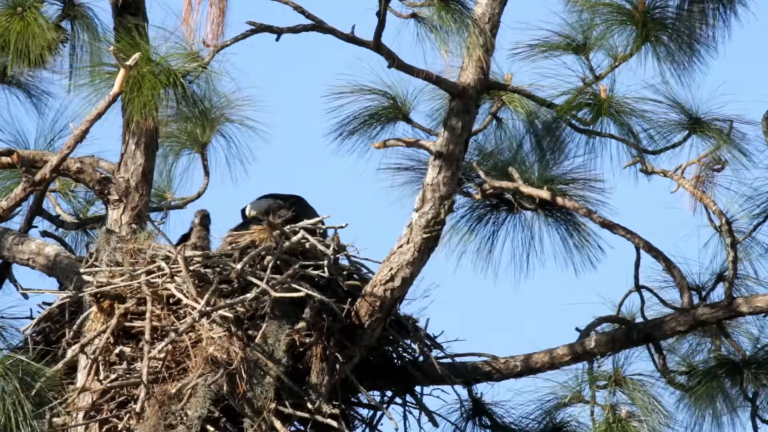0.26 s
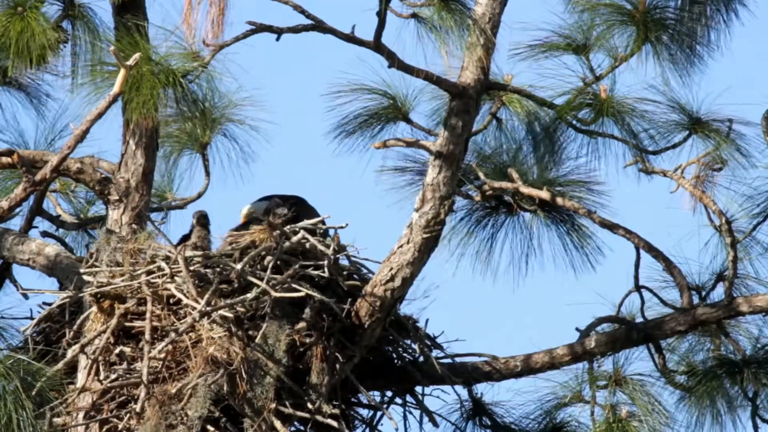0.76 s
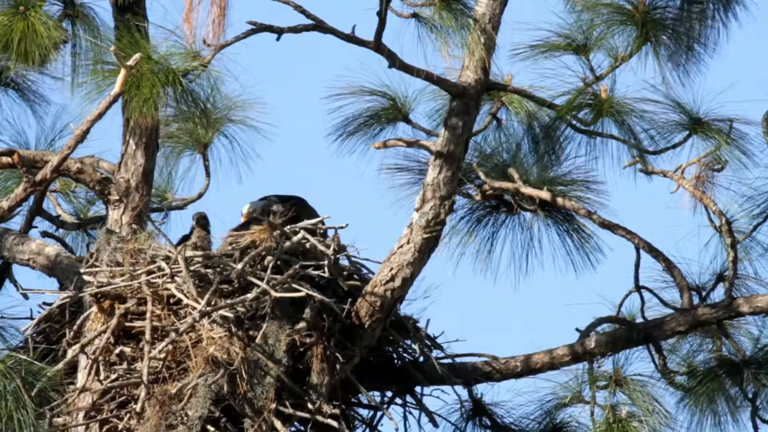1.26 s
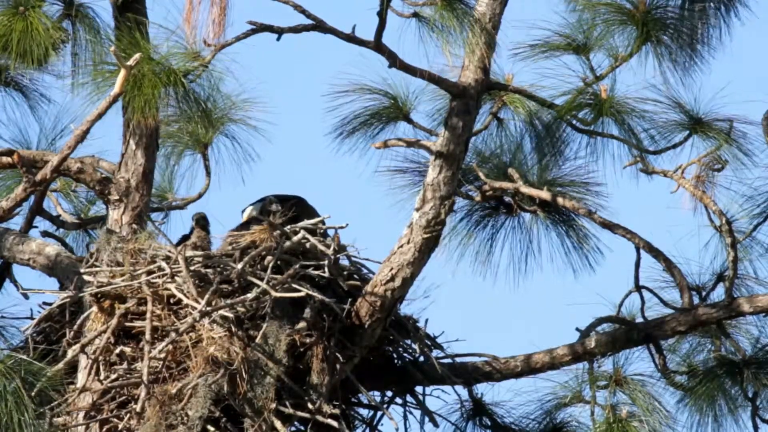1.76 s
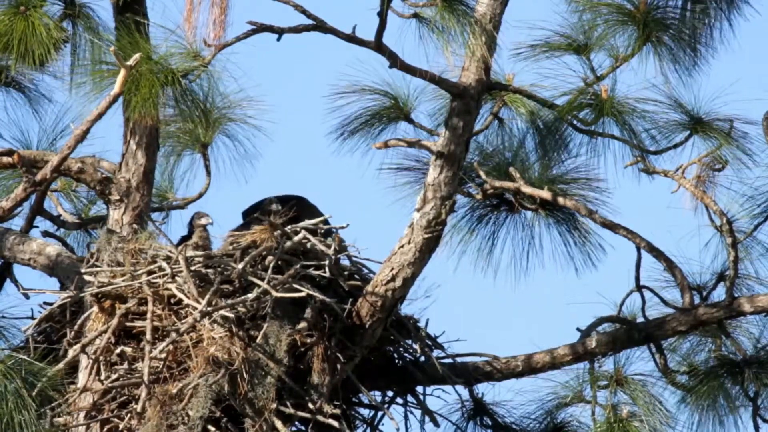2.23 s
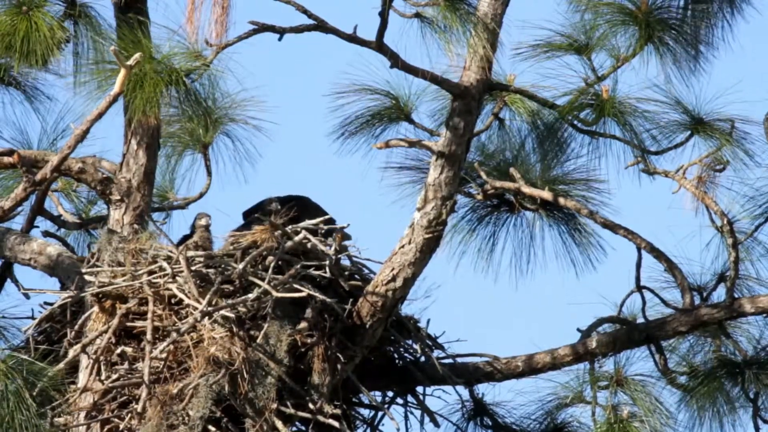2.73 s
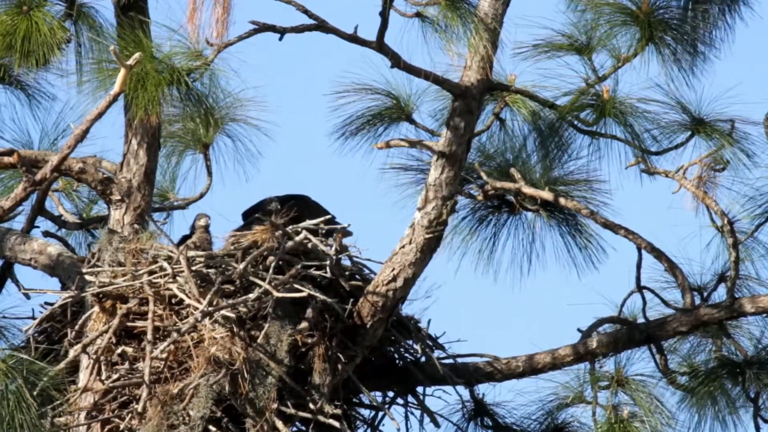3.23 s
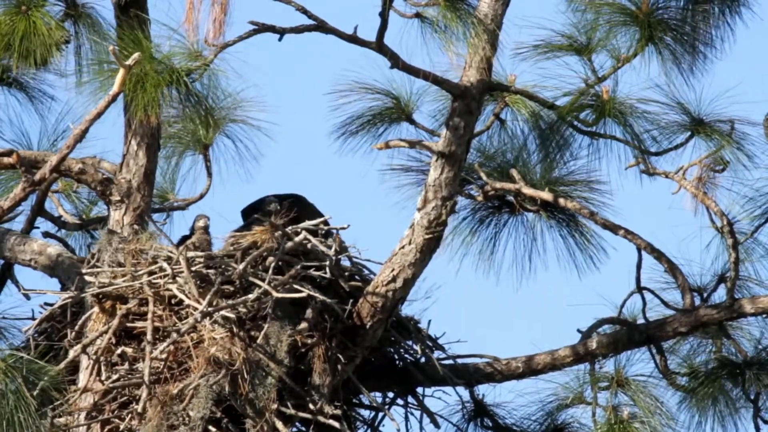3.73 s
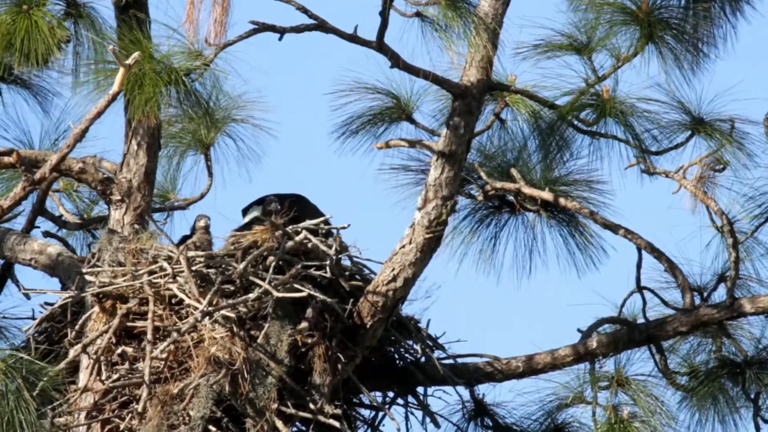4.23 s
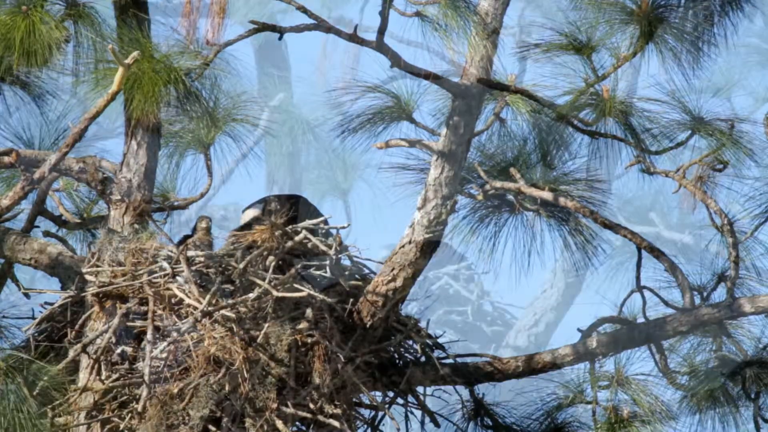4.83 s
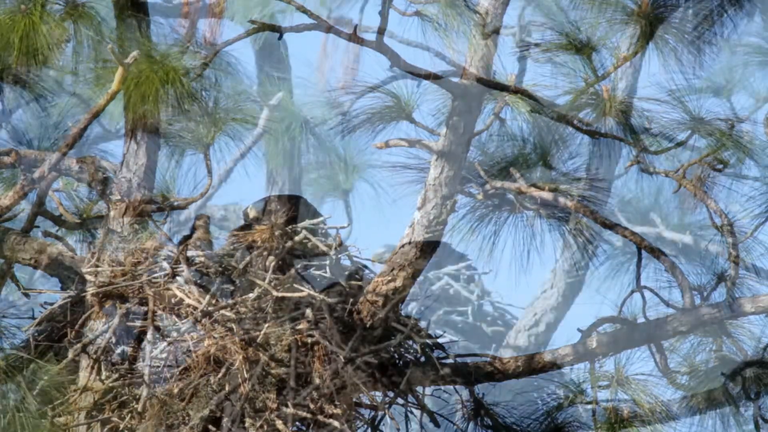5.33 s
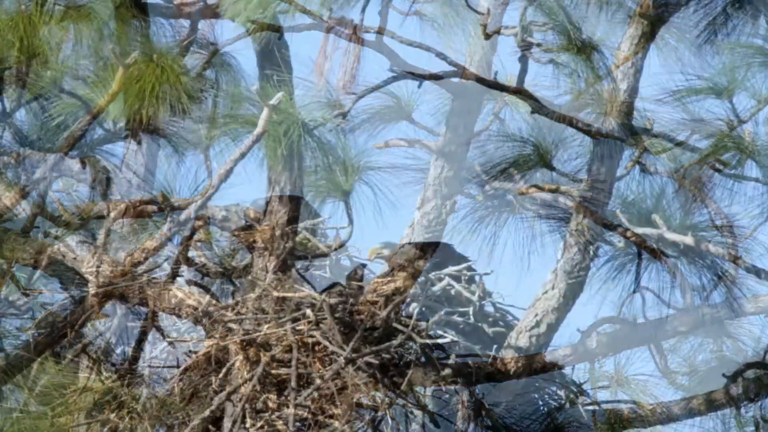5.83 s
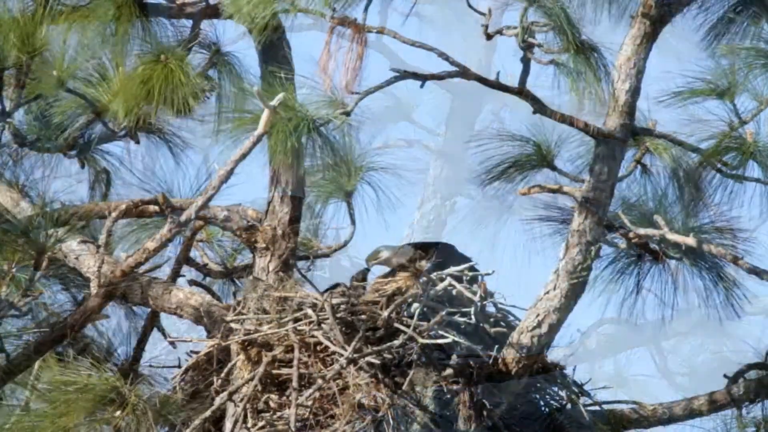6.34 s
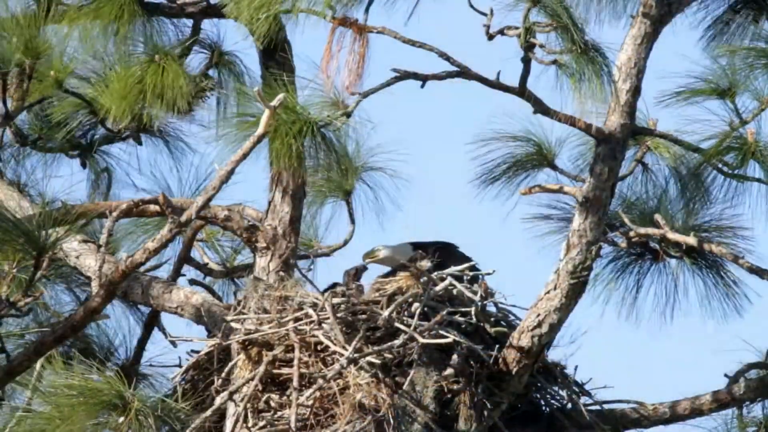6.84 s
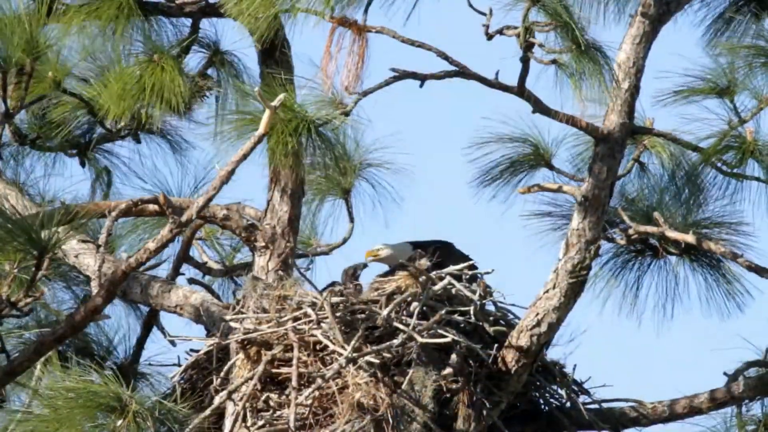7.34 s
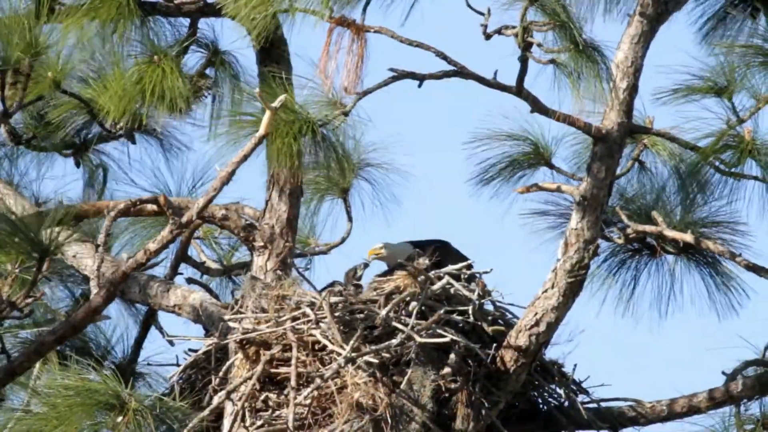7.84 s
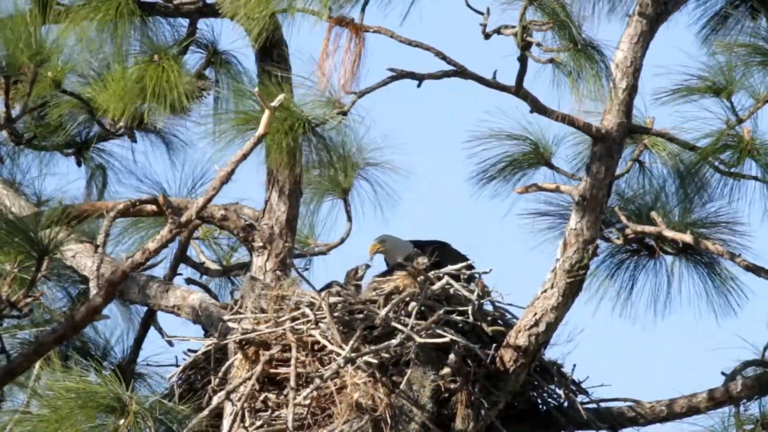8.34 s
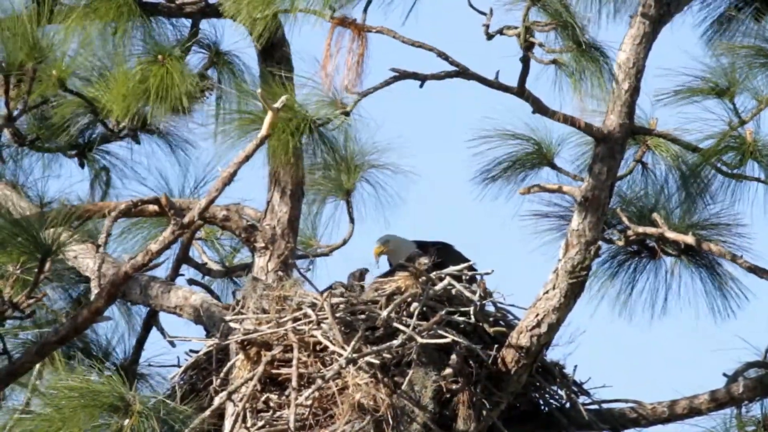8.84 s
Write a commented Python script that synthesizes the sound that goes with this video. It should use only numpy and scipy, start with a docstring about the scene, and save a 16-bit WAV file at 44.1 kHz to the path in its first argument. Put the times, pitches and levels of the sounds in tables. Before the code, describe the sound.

Outdoors at a treetop eagle nest, hoarse high chirps and fast trilling buzzes come in almost unbroken succession, with sharp little falling squeaks and rattling pips. They are densest at the start and sparser, softer later. A low steady machine hum lies underneath and fades after the middle. Light wind rumbles on the stereo microphone, distant traffic washes, and airy hiss stays constant.

```python
"""Small birds among pines

A flock buzzes, chirps, rattles and whistles: swinging tones and short gliding sines, with sparse echoes from trunks.
Under the birds a low machine hum fades away, far traffic washes and wind rumbles on two microphone ports,
all of it shaped noise or sines; wide hisses brush the treble now and then, over a constant airy hiss."""
import sys
import numpy as np
from scipy import signal
from scipy.fft import rfft, irfft, next_fast_len
from scipy.io import wavfile
from scipy.ndimage import uniform_filter1d

SR = 44100
rng = np.random.default_rng(int(sys.argv[2]) if len(sys.argv) > 2 else 0)


def digitize_waveform(pressure):
    """Quantize a signal to 16-bit integers and store it at the path in sys.argv[1].

    Rows of a 2-D input are taken as channels; values are limited to [-1, 1].
    """
    field = np.atleast_2d(pressure).T
    bounded = np.clip(field, -1, 1)
    quanta = np.round(bounded * 32767).astype(np.int16)
    wavfile.write(sys.argv[1], SR, quanta)


N = 400869  # length in samples

# Buzzes of the flock, swinging between two pitches; level is ahead of the bird mix and throat filter:
# start_s, length_s, effort_db, overtones_over_voice_db, nominal_low_turn_hz
BUZZ_CALLS = [(-.08, .14, -36, -11.5, 2622), (0.118, 0.3, -44, -9, 3314), (.47, 0.16, -51.5, 2, 3320),
              (.67, 0.2, -53.5, -4, 2499), (0.819, 0.41, -49.5, -13, 2647), (1.121, 0.17, -42, -13, 2877),
              (1.259, 0.19, -44.5, -11, 3236), (1.475, 0.38, -45.5, -13, 2914),
              (1.916, 0.094, -45, -11, 2680), (2.019, .17, -39.5, -13.5, 3080),
              (2.202, 0.15, -61.5, 5.5, 2696), (2.447, 0.17, -45, -12.5, 2965),
              (2.627, 0.13, -50, -3, 2714), (2.821, 0.35, -50.5, -8, 2917), (3.222, 0.3, -46.5, -11, 2752),
              (3.612, 0.21, -48, -14, 3227), (3.897, 0.19, -45.5, -10.5, 3003),
              (4.291, 0.45, -42.5, -17.5, 3314), (4.72, 0.22, -49.5, -10.5, 2728),
              (4.952, 0.19, -45.5, -17, 2680), (5.157, 0.13, -46, -12, 2676),
              (5.34, 0.27, -47.5, -12, 2895), (5.662, 0.25, -48.5, -13, 3123),
              (5.991, 0.52, -48.5, -12.5, 3500), (6.421, 0.27, -55, -10, 3020),
              (6.732, 0.36, -53, -10.5, 3030), (7.081, 0.18, -51.5, -12.5, 2985),
              (7.27, 0.15, -48, -19, 3020), (7.442, 0.15, -53, -13, 3010), (7.789, 0.18, -52, -10.5, 3040),
              (8.006, 0.3, -47.5, -12.5, 3475), (8.42, 0.42, -50.5, -14, 3040),
              (8.858, 0.33, -47.5, -13.5, 2946)]
# Colour difference between the two ports: pitch_hz, left_minus_right_db
PORT_COLOUR = [(60, -7), (180, -6), (550, -8.5), (1650, -3.5), (4970, 5.5), (15000, 1.5)]


def undb(db):
    """Decibels to gain."""
    return 10 ** (np.asarray(db) / 20)


def evened(x):
    """Scales a signal to rms 1."""
    return x / np.sqrt(np.mean(np.abs(x) ** 2) + 1e-20)


def read(points, hz):
    """Reads a spectrum table at hz, along a logarithmic pitch axis."""
    f, value = np.transpose(points)
    return np.interp(np.log(hz + 1), np.log(f + 1), value)


def curves(rows, t):
    """Reads every column of a time curve at t."""
    s, *columns = np.transpose(rows)
    return [np.interp(t, s, column) for column in columns]


def coloured(x, points, share=1):
    """Filters by a spectrum table, its decibels scaled by share."""
    size = next_fast_len(N)
    gain = undb(share * read(points, np.fft.rfftfreq(size, 1 / SR)))
    return irfft(rfft(x, size) * gain, size)[..., :N]


def wander(hz, channels=1):
    """Random drift of rms 1, low-passed at hz."""
    b, a = signal.butter(2, hz, fs=SR)
    return evened(signal.lfilter(b, a, rng.standard_normal((channels, N))))


def noise(points, same, patchy_db, tilt_db=0):
    """Two-port noise in drifting patches; same sets the likeness of the ports, tilt_db brightens per octave."""
    frames, hz = N // 256 + 5, np.fft.rfftfreq(1024, 1 / SR)[:, None]
    a, b, c, d, patches = rng.standard_normal((frames, 513, 5)).T
    patches = evened(uniform_filter1d(uniform_filter1d(patches, 10, 0), 14, 1))
    same = np.clip(same, -1, 1)
    left = a + 1j * b
    right = same * left + np.sqrt(1 - same ** 2) * (c + 1j * d)
    octaves = np.log2(np.maximum(hz / 800, 1))  # above 800 Hz
    z = np.array([left, right]) * undb(read(points, hz) + patchy_db * patches + tilt_db * octaves)
    return evened(signal.istft(z, nperseg=1024, noverlap=768)[1][:, :N])


def effort(t):
    """Gains of the flock's voices and overtones: each buzz swells and breaks off, all summed in power."""
    # Farther birds that fill the gaps: time_s, level_db
    between = [(0, -47), (5, -54.5), (6.6, -82), (9.09, -92)]
    attack_s, release_s, swell_db, between_over_db = 0.075, 0.072, 0.5, -16
    start, length, db, over_db, _ = np.transpose(BUZZ_CALLS)[:, :, None]
    edges = np.clip((t - start) / attack_s, 0, 1) * np.clip((start + length - t) / release_s, 0, 1)
    swelling_db = db - swell_db * np.clip(1 - (t - start) / length, 0, 1)
    power = (edges * undb(swelling_db)) ** 2
    rest = undb(curves(between, t)[0]) ** 2
    voice_power = power.sum(0) + rest
    over_power = (power * undb(over_db) ** 2).sum(0) + rest * undb(between_over_db) ** 2
    return np.sqrt([voice_power, over_power])


def buzzing(high_hz=4350, per_s=84, jitter=.04, hoarse_hz=250, near_db=-2, crowd_db=-10):
    """A near bird and four far ones: a hoarse tone swings fast between its turns, with overtones."""
    # Colour of the overtones: pitch_hz, level_db
    overtones = [(5000, 14), (5700, 9.5), (6500, 4.5), (7700, 1.5), (8500, -4), (9200, -1.5), (13000, -14),
                 (16000, -24)]
    # Throat filter, passing the voice between firm edges: pitch_hz, gain_db
    throat = [(1800, -26), (2400, 5), (3300, -7), (4300, -4), (4750, -82), (6000, -40)]
    # Breath noise in each voice, near bird first: power_share (0..1)
    breath_share = np.array([[.8], [.9], [.9], [.9], [.9]])
    t = np.arange(N) / SR
    start, *_, low_hz = np.transpose(BUZZ_CALLS)
    low = low_hz[np.searchsorted(start, t, "right") - 1]
    pace = np.array([[1], [.8], [.91], [1.13], [1.27]])  # each bird's swing rate against per_s
    rate = per_s * (pace + jitter * wander(39.8, channels=5))
    swing = np.sin(np.pi * np.cumsum(rate, 1) / SR) ** 2

    # each bird's two turning pitches drift on their own
    knots = rng.standard_normal((2, 5, 60))
    low_drift, high_drift = ([np.interp(t, np.linspace(0, t[-1], len(k)), k) for k in turn] for turn in knots)
    low = low * (1 + .05 * np.array(low_drift))
    high = high_hz * (.95 + .035 * np.array(high_drift))
    turn = np.exp(2j * np.pi * np.cumsum(low + (high - low) * swing ** 1.2, 1) / SR)

    breath = wander(hoarse_hz, channels=5) + 1j * wander(hoarse_hz, channels=5)
    near, *far = (turn * (np.sqrt(2 - 2 * breath_share) + np.sqrt(breath_share) * breath)).real
    crowd = np.array([far[0] + far[2], far[1] + far[3]])  # two far birds to each port

    # second and third harmonics, brightest on the upper turn
    over = ((turn ** 2 + 1.18 * turn ** 3) * (.35 + swing) * wander(600, channels=5)).real
    left, right = over[1] + over[3] + 0.93 * over[0], over[2] + over[4] - 0.77 * over[0]
    over = evened(coloured(np.array([left, right]), overtones))

    voice_gain, over_gain = (np.interp(t, t[::64], gain) for gain in effort(t[::64]))
    voices = coloured(undb(near_db) * near + undb(crowd_db) * crowd, throat)
    return voice_gain * voices + over_gain * over


def rattles(top_hz=4250, dwell=2.4, top_db=-10, octave_db=-7):
    """A near bird's pips: a tone swings up and back, loud where it dwells low; its octave streaks the treble."""
    # Runs of clear pips, level ahead of the swell and a common doubling:
    # start_s, length_s, first_low_turn_hz, pips_per_s, level_db
    runs = [(0.208, 0.11, 2870, 84, -36.5), (0.484, 0.14, 2880, 92, -39), (0.856, 0.067, 2940, 85, -50),
            (1.194, 0.076, 3035, 99, -48), (1.294, 0.24, 2880, 89, -43.5), (1.592, 0.17, 3100, 84.5, -48),
            (2.048, 0.041, 3270, 66, -44.5), (2.878, .065, 2940, 80, -48.5),
            (3.774, 0.082, 2870, 103, -45.5), (5.02, .13, 2890, 92, -48.5), (8.037, 0.13, 3200, 61, -51),
            (9.035, 0.074, 2950, 82, -45.5)]
    sink_hz, rough_share, voice_left_db, octave_left_db = 318, .3, -1.5, 1.4
    out = np.zeros((2, N + SR))  # rows: voice, octave
    for s, length, first_hz, pips_per_s, db in runs:
        t = np.arange(round(length * SR)) / SR
        up = np.sin(np.pi * pips_per_s * t) ** 2
        low_hz = first_hz - sink_hz * t / length
        phase = 2 * np.pi * np.cumsum(low_hz + (top_hz - low_hz) * up ** dwell) / SR
        swell = undb(db) * np.sin(np.pi * (t / length) ** 1.55) ** .5
        voice = ((1 - up) ** 2.05 + undb(top_db) * up) * np.sin(phase)
        octave = undb(octave_db) * up ** 3 * np.sin(2 * phase)
        out[:, round(s * SR):][:, :len(t)] += swell * np.array([voice, octave])
    out[:, :N] *= 1 + rough_share * wander(290)
    side = np.array([[.5], [-.5]])
    return 2 * (out[0, :N] * undb(side * voice_left_db) + out[1, :N] * undb(side * octave_left_db))


def notes(rows, waver=0.014, octave_db=-25, rasp_share=.4):
    """Sines that glide between two pitches, rough and wavering; a rasp widens them, more so the higher they are."""
    curl, throb_share = 1.4, .35  # a glide steepens towards its end; the level throbs
    out = np.zeros((2, N + SR))
    flutter = np.pad(np.vstack([wander(35), wander(90), wander(500)]), ((0, 0), (0, SR)))
    for s, length, first_hz, last_hz, db, left_db in rows:
        edge = min(.2 * length, .012)  # seconds added at either end for the fades
        at = max(round((s - edge) * SR), 0)
        u = np.arange(-edge, length + edge, 1 / SR) / length
        bend, throb, rasp = flutter[:, at:at + len(u)]
        hz = (first_hz + (last_hz - first_hz) * np.abs(u) ** curl) * (1 + waver * bend)
        phase = 2 * np.pi * np.cumsum(hz) / SR
        rough = 1 + throb_share * throb + rasp_share * max(first_hz / 3000, 1) * rasp
        tone = np.sin(phase) + undb(octave_db) * np.sin(2 * phase)
        tone = tone * rough * signal.windows.tukey(len(u), .55)
        out[:, at:at + len(u)] += np.sqrt(2) * undb(db + np.array([[.5], [-.5]]) * left_db) * tone
    return out[:, :N]


def placed(rows, left_db):
    """Adds a left-minus-right level column to rows of notes."""
    return np.column_stack([rows, left_db * np.ones(len(rows))])


def clear_chirps():
    """The clearest chirps as rows of notes, leaning left on top of the port colour at their pitch."""
    # start_s, length_s, first_pitch_hz, last_pitch_hz, level_db
    chirps = [(0.031, 0.029, 4290, 2690, -48), (0.096, 0.16, 2535, 2290, -47),
              (.342, 0.012, 1800, 2800, -55), (0.351, .036, 2850, 2640, -44),
              (0.387, .008, 2700, 1810, -46), (0.692, 0.017, 2650, 2600, -39.5),
              (0.696, .038, 1680, 1670, -50), (0.711, .018, 3750, 3734, -50),
              (.714, 0.018, 2600, 2550, -36), (0.708, 0.03, 7200, 7600, -50),
              (0.742, 0.022, 2850, 1870, -37.5), (.767, .008, 2300, 1850, -45),
              (0.774, 0.017, 2450, 2300, -48), (0.79, 0.024, 4300, 3890, -51),
              (0.78, 0.018, 8500, 8760, -58), (0.803, 0.016, 2600, 2170, -47),
              (1.018, 0.023, 2615, 2630, -40.5), (1.046, 0.025, 2590, 2596, -36.5),
              (1.154, 0.024, 4040, 3436, -48), (1.252, 0.031, 2880, 1540, -50),
              (1.453, 0.018, 8290, 7960, -60), (1.454, 0.024, 4200, 3534, -51.5),
              (1.561, 0.033, 2080, 1610, -53), (1.947, 0.023, 7600, 6670, -54.5),
              (2.087, 0.028, 4800, 4870, -50), (1.727, 0.045, 7250, 7200, -52),
              (1.766, 0.018, 2800, 2317, -44.5), (1.785, 0.052, 1850, 1244, -56.5),
              (1.828, 0.039, 2815, 1798, -46), (1.954, 0.015, 3750, 2740, -46),
              (2.132, 0.022, 7750, 7230, -50), (2.128, 0.021, 3950, 3500, -46),
              (2.147, 0.03, 2750, 2450, -44), (2.316, 0.021, 2700, 2210, -51),
              (2.347, 0.01, 1500, 2757, -55), (2.354, 0.01, 2760, 2620, -46),
              (2.363, 0.012, 2680, 1510, -51), (2.683, 0.029, 2350, 1650, -49),
              (2.711, .022, 1750, 1310, -52), (2.706, .012, 1900, 2770, -46), (2.712, .05, 5250, 4750, -53),
              (2.724, 0.037, 3000, 2284, -51), (2.868, .02, 3900, 3550, -52.5),
              (2.903, 0.018, 3000, 1100, -57), (2.901, 0.031, 4210, 5190, -50.5),
              (2.938, 0.075, 2170, 1628, -54), (3.107, 0.0073, 2874, 2120, -43),
              (3.108, 0.014, 1000, 2900, -54), (3.119, 0.012, 2780, 2300, -50),
              (3.12, .015, 1585, 1420, -57), (3.167, 0.016, 3950, 3180, -49),
              (3.469, 0.029, 7500, 6360, -55), (3.508, 0.014, 2600, 2000, -52),
              (3.75, 0.041, 7900, 7420, -53), (3.903, .025, 4200, 4910, -61),
              (3.451, 0.032, 1895, 1750, -51.5), (3.626, 0.021, 4700, 3610, -48),
              (3.647, 0.015, 3300, 2010, -45.5), (3.675, .018, 3750, 3550, -56),
              (3.703, 0.021, 2900, 1886, -50), (3.729, .016, 2200, 1740, -49),
              (3.745, 0.032, 3800, 3580, -48), (3.771, 0.017, 2750, 2680, -45),
              (3.933, 0.014, 2987, 2344, -41), (3.944, 0.029, 4900, 3334, -51),
              (3.97, 0.018, 3600, 2980, -47), (4.001, 0.021, 3550, 3450, -51),
              (4.014, 0.033, 2750, 1645, -47), (4.256, 0.032, 2600, 2020, -50),
              (4.409, .01, 2850, 2830, -48), (4.419, 0.0099, 2500, 2470, -47),
              (4.474, 0.014, 3100, 2613, -45), (4.53, .04, 7600, 6560, -56),
              (4.557, 0.046, 2723, 2595, -43.5), (4.605, 0.025, 2750, 2500, -46.5),
              (4.638, 0.048, 3470, 2287, -49), (4.621, 0.022, 7300, 6980, -55),
              (5.037, 0.035, 7700, 7050, -57), (4.738, 0.035, 6900, 6350, -54.5),
              (4.748, .02, 5150, 5050, -55), (4.857, 0.04, 4260, 1794, -50), (4.951, .02, 3990, 3506, -54),
              (4.957, 0.048, 2756, 2546, -46), (5.073, 0.02, 2380, 2320, -42),
              (6.093, 0.29, 4150, 4230, -54.5), (5.544, 0.02, 3020, 2240, -48.5),
              (5.85, 0.027, 3040, 2515, -51), (6.095, 0.016, 2560, 3090, -56),
              (6.1, 0.017, 2040, 1680, -56), (6.137, 0.034, 3050, 2110, -50.5),
              (6.547, 0.036, 1853, 1950, -55), (6.987, 0.033, 4100, 2480, -47),
              (7.512, 0.021, 3730, 3700, -56), (7.606, 0.019, 3820, 3400, -54.5),
              (7.845, 0.013, 2300, 3200, -56), (7.862, 0.022, 4080, 2266, -52),
              (8.216, 0.015, 3800, 3610, -58), (8.946, 0.014, 2930, 2100, -55)]
    return placed(chirps, 1.5 + read(PORT_COLOUR, np.transpose(chirps)[2]))


def chatter(per_s=29, db=-8):
    """Small falling chirps of the rest of the flock, at random, rising and sinking with its buzzing."""
    squeaks_db = -3  # high squeaks against the low chirps
    count = round(per_s * N / SR)
    s, size, pitch, fall, side, high = rng.random((count, 6)).T
    squeak = high < .4
    first_hz = np.where(squeak, 6400 + 2200 * pitch, 3300 + 1100 * pitch)
    level_db = 20 * np.log10(effort(s * N / SR)[0]) + db + squeaks_db * squeak
    return np.transpose([s * N / SR, .01 + .015 * size, first_hz, first_hz - 900 * fall, level_db, 16 * side - 5])


def whistles():
    """Thin far whistles: wavering, gliding sines well to the left."""
    # start_s, length_s, first_pitch_hz, last_pitch_hz, level_db
    calls = [(1.6, 0.081, 4670, 4650, -59), (1.66, 0.23, 4970, 4750, -59.5), (1.86, 0.11, 4980, 5300, -67),
             (6.09, 0.14, 6200, 6400, -68), (6.23, 0.099, 6660, 6820, -69), (6.66, 0.19, 5416, 5130, -66),
             (6.81, 0.12, 5500, 5180, -62), (6.91, 0.11, 5200, 5590, -63), (6.825, 0.031, 9800, 9950, -68),
             (6.876, 0.077, 6530, 6290, -65), (7.065, 0.061, 9300, 9240, -69.5)]
    return notes(placed(calls, 14), waver=.018)


def trees(x, wet_db):
    """Scatter from the trunks: sparse dying echoes of random sign, other ones for each port."""
    t60_s, echoes_per_s = 0.098, 1500
    t = np.arange(SR // 2) / SR
    taps = rng.choice([-1., 1.], (2, len(t))) * (rng.random((2, len(t))) < echoes_per_s / SR)
    taps = taps * undb(-60 * t / t60_s) * (t > .004)
    taps = taps / np.linalg.norm(taps, axis=1, keepdims=True)
    return x + undb(wet_db) * signal.oaconvolve(x, taps, axes=1)[:, :N]


def led(x):
    """Delays the right port by 3 samples, so that the birds reach the left one first."""
    return np.array([x[0], np.pad(x[1], (3, 0))[:N]])


def rustles():
    """Wide hisses reaching far into the treble, perhaps wings: noise that swells and breaks off."""
    # Bursts: start_s, length_s, level_db
    bursts = [(0.35, 0.19, -58), (1.3, .1, -55), (3.351, 0.14, -54.5), (3.925, .12, -64)]
    # Colour of the hiss: pitch_hz, relative_level_db (per Hz)
    colour = [(4200, -40), (4900, 3), (6000, -5), (9000, -7), (12000, -10), (16000, -23)]
    edge_s = 0.018
    t = np.arange(N) / SR
    swell = 0
    for s, length, db in bursts:
        swell += undb(db) * np.clip((t - s) / edge_s, 0, 1) * np.clip((s + length - t) / edge_s, 0, 1)
    return swell * noise(colour, same=.3, patchy_db=1.2)


def hum():
    """A steady low machine tone, a sine that fades late, with faint wavering companions."""
    # Main tone: time_s, pitch_hz, level_db
    tone = [(0.0, 68, -44.5), (0.1, 66.46, -43.5), (2.54, 66.56, -41.5), (2.761, 66.6, -44.5),
            (4.18, 66.5, -39), (6.2, 67.2, -53)]
    # Companions: pitch_hz, level_db
    drones = [(96, -54), (280, -66.5)]
    left_lead_rad = 0.67
    t = np.arange(N) / SR
    hz, db = curves(tone + [(7.2, tone[-1][1], -62)], t)  # settles at a faint rest
    phase = 2 * np.pi * np.cumsum(hz) / SR
    companions = sum(undb(d) * wander(12.2) * np.sin(2 * np.pi * f * t) for f, d in drones)
    companions = companions * np.clip((6.3 - t) / 1.0, 0, 1)  # gone at 6.3 s
    return np.sqrt(2) * (undb(db) * np.sin(phase + np.array([[left_lead_rad], [0]])) + companions)


def wind():
    """Wind on the ports: lumpy low noise, partly alike in the two and later partly opposed."""
    # Gusts: time_s, level_db
    gusts = [(0.0, -53), (1.85, -51), (1.95, -44.5), (2.48, -50), (2.68, -44.5), (3.49, -51), (3.59, -42.5),
             (5.34, -51.5), (5.87, -40), (6.38, -44), (6.53, -35.5), (7.01, -44.5), (7.06, -39.5),
             (8.08, -47.5), (8.18, -43.5), (8.53, -43), (8.58, -40.5), (9.09, -45.5)]
    # Colour of the rumble: pitch_hz, relative_level_db (per Hz)
    colour = [(12, -70), (20, -16), (32, -9.5), (118, 2.5), (157, -4.5), (288, -19), (500, -30), (650, -61),
              (1100, -120)]
    # Likeness of the two ports: time_s, likeness (-1..1)
    likeness = [(0, 0.29), (5, 0.2), (6.3, -0.48)]
    same = curves(likeness, np.arange(N // 256 + 5) * 256 / SR)[0]
    return undb(curves(gusts, np.arange(N) / SR)[0]) * noise(colour, same=same, patchy_db=1.33)


def traffic():
    """Far traffic: a wide wash of noise that swells and brightens as cars pass."""
    # Passes: time_s, level_db, brightness_db_per_octave (above 800 Hz)
    passes = [(0.0, -54, -9), (0.66, -55, -12), (3.97, -52.5, -6), (5.47, -54.5, -5), (7.04, -49, -1),
              (8.15, -52, -3.5), (9.01, -50, -5), (9.09, -54, 3)]
    # Colour of the wash: pitch_hz, relative_level_db (per Hz)
    colour = [(150, 2.5), (250, -2), (341, -4), (668, 4.5), (806, 3.5), (1530, 1), (3500, -17.5),
              (4550, -23), (7700, -120)]
    db = curves(passes, np.arange(N) / SR)[0]
    tilt_db = curves(passes, np.arange(N // 256 + 5) * 256 / SR)[1]
    return undb(db) * noise(colour, same=0.75, patchy_db=0.7, tilt_db=tilt_db)


def air():
    """Far flock and hiss: patchy noise, unlike in the two ports."""
    # Colour of the air: pitch_hz, relative_level_db (per Hz)
    colour = [(1180, -12), (2000, -4.5), (3540, -6), (4130, -10), (4630, -9), (7380, -18.5), (9000, -24),
              (15100, -27), (15800, -23)]
    return undb(-54.5) * noise(colour, same=-0.015, patchy_db=2.5)


def scene():
    """Birds among the trunks over hum, wind, traffic and hiss; the near rattling bird is the driest."""
    ground = hum() + wind() + traffic() + rustles() + air()
    bed = led(trees(buzzing(), wet_db=-2)) + ground
    ports = [coloured(port, PORT_COLOUR, share) for port, share in zip(bed, (.5, -.5))]
    calls = notes([*clear_chirps(), *chatter()]) + whistles()
    return np.array(ports) + led(trees(calls, wet_db=-8) + trees(rattles(), wet_db=-13))


def band_limit(x):
    """A steep low-pass at the top of the band."""
    return signal.sosfilt(signal.butter(12, 15940, fs=SR, output="sos"), x)


def record(dry):
    """Delivers the finished mix."""
    return band_limit(dry)


dry = scene()
out = record(dry)
digitize_waveform(out)
```